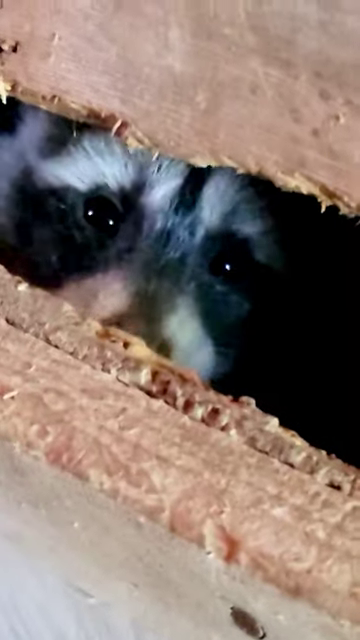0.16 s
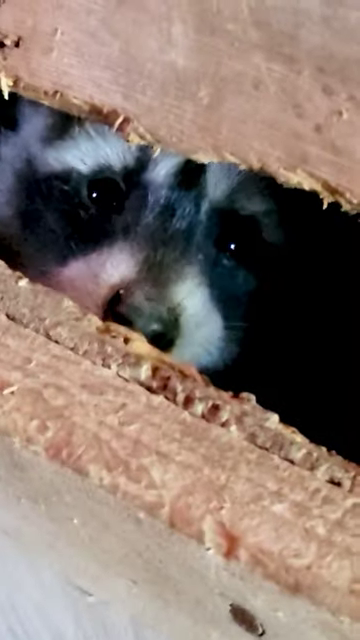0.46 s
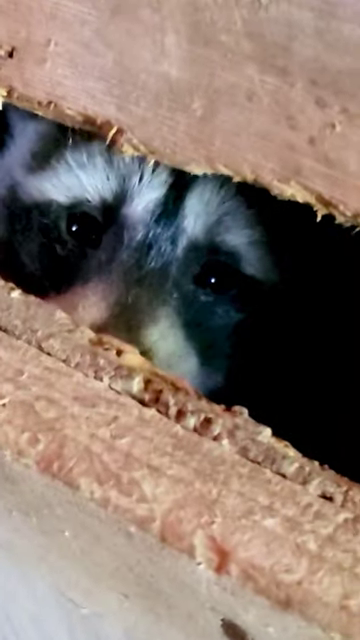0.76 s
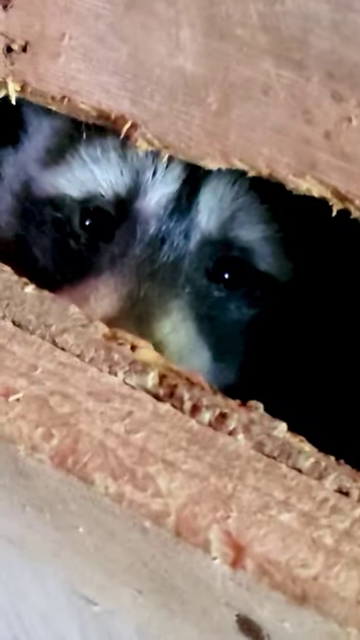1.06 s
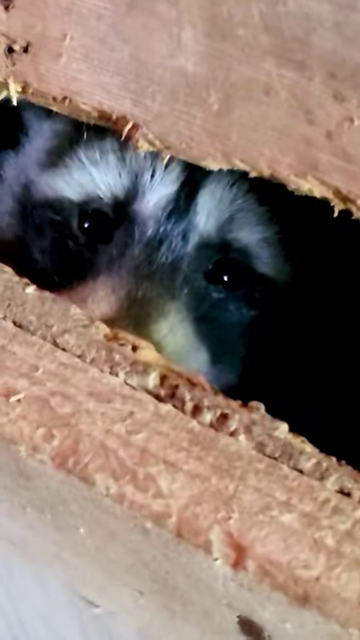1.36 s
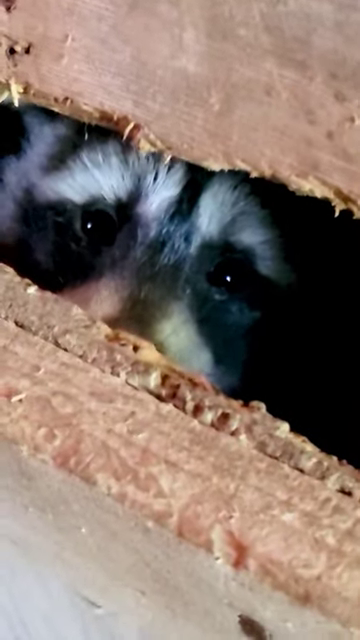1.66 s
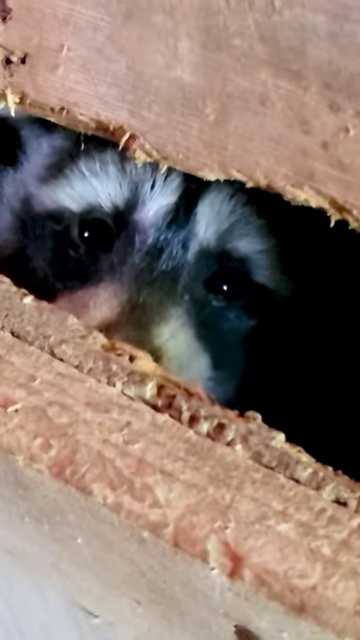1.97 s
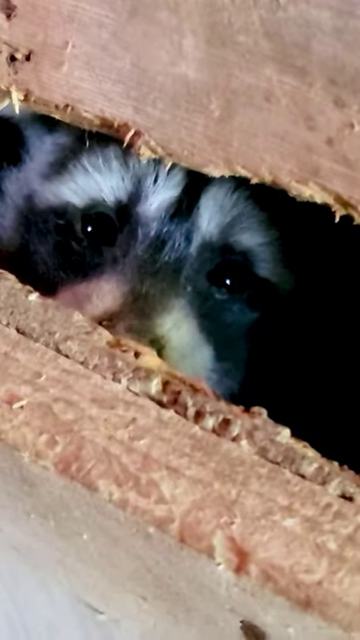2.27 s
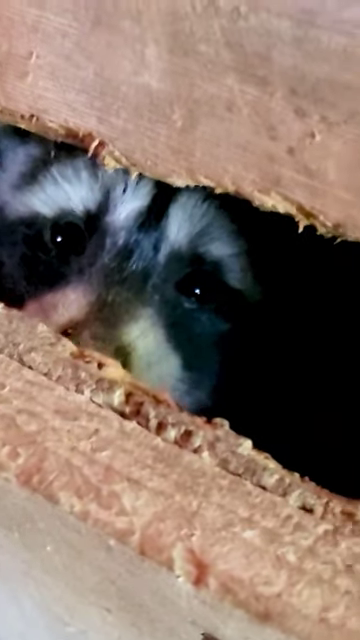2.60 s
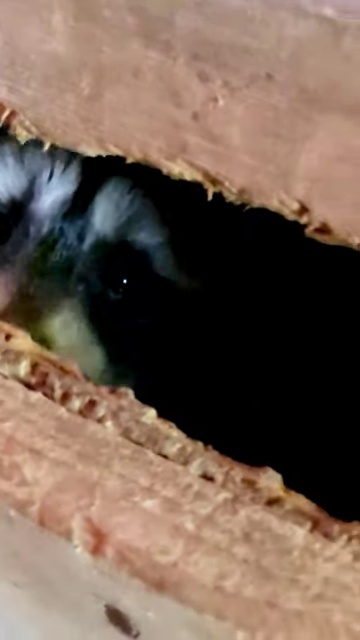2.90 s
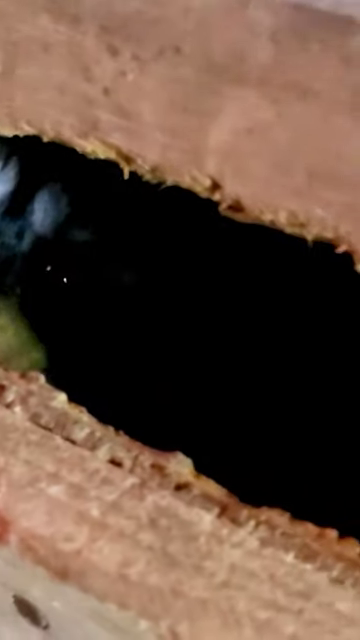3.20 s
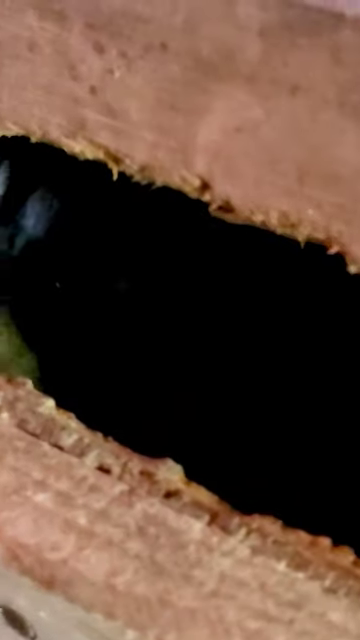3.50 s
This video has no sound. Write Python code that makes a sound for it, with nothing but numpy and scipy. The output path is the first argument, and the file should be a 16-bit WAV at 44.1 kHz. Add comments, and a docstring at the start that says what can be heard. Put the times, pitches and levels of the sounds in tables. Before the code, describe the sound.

Young raccoon chitters in three rapid, rasping bursts inside a hollow wooden machine, a bird whistling nearby

```python
"""Raccoon chittering in a wooden machine

Inside a hollow wooden machine a young raccoon chitters three times: runs of short near-sine chirps with
overtones, rasp and snaps through throat resonances, and puffs of nasal hiss. First comes the short end of an
earlier chirp (a dying sine). A bird whistles twice nearby (gliding sines with echoes), claws tick and knock
on the wood (dying sines, a noise crack), and faint far chirps and scuffs (narrow noise) sound.
Farm air (broad noise) and a low motor drone (narrow noise) lie under."""
import sys
import numpy as np
from scipy import signal
from scipy.fft import rfft, irfft
from scipy.io import wavfile

SR = 44100
rng = np.random.default_rng(int(sys.argv[2]) if len(sys.argv) > 2 else 0)


def gain_from_db(level_db):
    """Turn a decibel level (scalar or array-like) into a linear amplitude factor."""
    decades = np.asarray(level_db, float) / 20
    return 10 ** decades


def transcribe(signal):
    """Save signal, clipped to [-1, 1], as a 16-bit WAV file at the path in sys.argv[1]."""
    frames = np.atleast_2d(signal).T
    limited = np.clip(frames, -1, 1)
    pcm = np.round(limited * 32767).astype(np.int16)
    wavfile.write(sys.argv[1], SR, pcm)


N = 160965


def rms_one(x):
    """Scale to rms 1."""
    return x / np.sqrt(np.mean(x ** 2) + 1e-20)


def at_hz(points, hz):
    """Read a (Hz, value) table on a log-frequency axis."""
    table_hz, values = np.array(points).T
    return np.interp(np.log(hz), np.log(table_hz), values)


def drift(rate_hz):
    """Random wander with rms 1: white noise through two equal low-pass poles."""
    r = np.exp(-2 * np.pi * rate_hz / SR)
    noise = rng.standard_normal(N + SR)
    return rms_one(signal.lfilter([1], [1, -2 * r, r * r], noise)[SR:])


def peak(x, hz, width_hz):
    """A two-pole resonance with a gain of about 1 on top."""
    r = np.exp(-np.pi * width_hz / SR)
    poles = [1, -2 * r * np.cos(2 * np.pi * hz / SR), r * r]
    return signal.lfilter(np.array([1, 0, -1]) * (1 - r * r) / 2, poles, x)


def ring(start_s, db, hz, t60_s):
    """A dying sine: it rises within 0.67 ms and fades exponentially."""
    t = np.maximum(np.arange(N) / SR - start_s, 0)
    return gain_from_db(db - 60 * t / t60_s) * np.minimum(t / 0.00067, 1) * np.sin(2 * np.pi * hz * t)


def notes(tables, edge_s):
    """Pitch and gain in time for separate notes, gliding from row to row."""
    t = np.arange(N) / SR
    time_s, pitch_hz, level_db = np.concatenate(tables).T
    gate = 0
    for note in tables:
        inside_s = np.minimum(t - note[0][0], note[-1][0] - t)
        gate = gate + np.clip(inside_s / edge_s + .5, 0, 1)
    gain = np.minimum(gate, 1) * gain_from_db(np.interp(t, time_s, level_db))
    return np.interp(t, time_s, pitch_hz), gain


def coloured(spectrum, likeness):
    """Stereo noise of the given spectrum and left-right likeness; its mid part has rms 1."""
    hz = np.maximum(np.arange(N // 2 + 1) * SR / N, 1)
    mid, side = rfft(rng.standard_normal((2, N))) * gain_from_db(at_hz(spectrum, hz))
    alike = np.clip(at_hz(likeness, hz), -1, 1)
    mid = irfft(mid * np.sqrt(1 + alike), N)
    side = irfft(side * np.sqrt(1 - alike), N)
    return np.array([mid + side, mid - side]) / np.std(mid)


def placed(x):
    """Two microphones: a level difference by pitch and a short lag on the right."""
    # the left microphone gets more of the lows, the right more of the highs: pitch_hz, left_minus_right_db
    shadow = [(640, 6), (1400, 7), (3100, -2), (6800, -8)]
    lag_s = .00008
    hz = np.maximum(np.arange(N // 2 + 1) * SR / N, 1)
    tilt = gain_from_db(at_hz(shadow, hz) / 2)
    return irfft(rfft(x) * [tilt, np.exp(-2j * np.pi * hz * lag_s) / tilt], N)


def echoes(x, t60_s, cut_hz):
    """Dense dying reflections up to 0.4 s, others for each side, dulled above cut_hz."""
    t = np.arange(int(.4 * SR)) / SR
    tail = rng.standard_normal((2, len(t))) * gain_from_db(-60 * t / t60_s) * np.minimum(t / 0.0038, 1)
    tail = signal.sosfilt(signal.butter(1, cut_hz, fs=SR, output="sos"), tail)
    tail = tail / np.sqrt((tail ** 2).sum(1, keepdims=True))
    return signal.fftconvolve(x[None], tail, axes=1)[:, :N]


def raccoon():
    """The animal's voice and nose puffs at the microphones, with reflections from the hollow box."""
    both = chirping_voice() + nose_puffs()
    return placed(both) + gain_from_db(-11) * echoes(both[0], .15, 2600)


def chirping_voice():
    """Near-sine chirps; overtones, breath rasp and a closing snap pass the throat resonances."""
    # one table per chirp: time_s, pitch_hz, level_db (rms of the fundamental)
    chirps = [
        [(0.052, 1050, -40), (0.06, 1104, -27.5), (0.066, 850, -40), (0.077, 950, -27), (0.083, 1000, -51)],
        [(0.107, 866, -29), (0.112, 1126, -30), (0.12, 755, -17), (0.128, 699.4, -18), (0.135, 855, -37)],
        [(0.161, 850, -37), (0.169, 960, -28), (0.179, 1050, -34.5), (0.182, 790, -15), (0.186, 780, -14),
         (0.19, 850, -31.5)],
        [(0.221, 980, -33.5), (0.228, 740, -18), (0.233, 680, -24.5), (0.239, 660, -16), (0.248, 720, -30)],
        [(0.271, 931, -26), (0.28, 727, -19.5), (0.287, 671, -16.5), (0.291, 1095, -24), (0.296, 1009, -37)],
        [(0.324, 950, -36), (0.336, 1000, -39), (0.341, 860, -20), (0.348, 893, -36)],
        [(1.675, 789.6, -38), (1.682, 884.5, -60)],
        [(1.724, 1013, -48), (1.726, 971, -28), (1.729, 1103, -40), (1.742, 797, -23), (1.748, 1042, -53)],
        [(1.784, 1106, -53), (1.786, 1037, -27.5), (1.796, 1135, -33), (1.803, 849.5, -18), (1.81, 913, -42)],
        [(1.844, 817, -25), (1.856, 1088, -32), (1.864, 771.2, -13), (1.872, 889, -36)],
        [(1.904, 868, -50), (1.907, 842.7, -31), (1.922, 1141, -39), (1.931, 878.7, -17.5), (1.937, 964, -54)],
        [(1.964, 887, -37.5), (1.976, 1126, -23.5), (1.986, 792, -34), (1.992, 890.5, -15.5), (1.998, 936, -42)],
        [(2.027, 950, -30), (2.032, 1100, -22), (2.036, 760, -28), (2.046, 720.4, -23), (2.05, 908, -28),
         (2.055, 1019, -22.5)],
        [(2.084, 839.7, -15), (2.105, 664.4, -28), (2.11, 811.8, -21.5), (2.115, 909, -23)],
        [(2.148, 978, -31), (2.156, 1070, -25.5), (2.164, 740, -31), (2.171, 720, -32), (2.175, 963.6, -22.5),
         (2.18, 906, -46.5)],
        [(2.211, 930, -34.5), (2.23, 1060, -32.5), (2.235, 780, -24.5), (2.246, 730, -32.5),
         (2.253, 930, -19.5)],
        [(2.289, 800, -45.5), (2.305, 850, -36.5), (2.316, 800, -46), (2.335, 900, -41), (2.362, 780, -42.5)],
        [(3.044, 917, -45), (3.054, 760, -45.5)],
        [(3.088, 996, -29.5), (3.099, 876, -44), (3.103, 731, -31)],
        [(3.145, 1006, -26.5), (3.159, 831, -35.5), (3.167, 1054, -36), (3.172, 1094, -27.5)],
        [(3.201, 1078, -24.5), (3.205, 828.6, -18), (3.218, 760, -21.5), (3.224, 893, -17)],
        [(3.257, 918, -31), (3.26, 896.7, -15.5), (3.271, 705.5, -17.5), (3.282, 878, -17), (3.285, 811.5, -35)],
        [(3.315, 953, -19.5), (3.321, 902, -21), (3.324, 720, -17), (3.34, 728, -15), (3.345, 727, -30.5)],
        [(3.377, 930, -20.5), (3.386, 708, -19), (3.398, 738, -17), (3.406, 855, -17.5)],
        [(3.437, 814.7, -23), (3.441, 727.6, -14.5), (3.447, 665, -21.5), (3.459, 725, -21.5),
         (3.464, 723, -38.5)],
        [(3.491, 739.3, -23), (3.502, 681, -22), (3.509, 713, -19.5), (3.515, 704, -35)],
        [(3.544, 1023, -28), (3.552, 652, -18), (3.557, 676, -21.5), (3.563, 795, -43)],
    ]
    # 2nd to 7th partial before the throat colours them: level_db
    overtones = [-16.5, -15, -29.5, -28.5, -20.5, -22.5]
    # throat resonances: pitch_hz, width_hz, gain_db
    throat = [(1269, 125, 6.5), (1872, 226, 7), (2140, 100, -1.5), (2756, 145, -1.5), (3300, 540, -21.5)]
    # lower and upper limit of the throat sound: cutoff_hz
    throat_band = [470, 4750]
    jitter, shimmer_db = .013, 1.4  # pitch wander (share of the pitch) and level wander of a firm voice
    weak_db, rough_per_db = -30, .2  # below this level both wanders grow, by this share per dB
    rasp_db, closing_db, closing_s = -16.5, -13.5, 0.0023  # before the throat; delay and width of the snap

    hz, gain = notes(chirps, 0.0017)
    weak = 1 + rough_per_db * np.clip(weak_db - 20 * np.log10(gain + 1e-9), 0, 10)
    phase = 2 * np.pi * np.cumsum(hz * (1 + jitter * weak * drift(198.5))) / SR
    tone = np.sqrt(2) * gain * np.sin(phase) * gain_from_db(shimmer_db * weak * drift(157))
    upper = 0
    for k, db in enumerate(overtones):
        upper = upper + gain * gain_from_db(db + 5.24 * drift(28)) * np.sin((k + 2) * phase + k)

    # the throat snaps shut just after the louder of a chirp's last two rows
    t, snap = np.arange(N) / SR, 0
    for chirp in chirps:
        last_s, _, db = max(chirp[-2:], key=lambda row: row[2])
        snap = snap + gain_from_db(db + closing_db) * np.exp(-((t - last_s - closing_s) / closing_s) ** 2)

    breath = rng.standard_normal(N) * (1 + np.cos(phase)) * 2  # pulses once a cycle
    source = upper + breath * (gain_from_db(rasp_db) * gain + snap)
    resonant = sum(gain_from_db(db) * peak(source, f, width) for f, width, db in throat)
    band = signal.butter(3, throat_band, "band", fs=SR, output="sos")
    return tone + signal.sosfilt(band, resonant)


def nose_puffs():
    """Puffs of air hiss at the nose: grainy coloured noise with a quick rise and a dying tail."""
    # puffs: time_s (middle of the rise), peak_db (the noise envelope lies 13 dB lower)
    puffs = [(0.0605, -38.5), (0.1174, -41.5), (0.178, -39), (0.2275, -37.5), (0.2783, -37.5),
             (0.3384, -43), (0.373, -47), (1.734, -38.5), (1.798, -41.5), (1.8584, -38), (1.9245, -40),
             (1.98, -36.5), (2.0348, -33.5), (2.087, -35.5), (2.1576, -35.5), (2.235, -36.5), (2.3565, -47),
             (3.045, -50), (3.096, -44), (3.1528, -36.5), (3.2031, -39), (3.27, -33.5), (3.3234, -38),
             (3.3807, -37), (3.4396, -37), (3.4994, -37), (3.5468, -41), (3.6277, -42)]
    # shape of the hiss: pitch_hz, level_db (per Hz, relative)
    hiss = [(3000, -29.5), (4500, -4), (5400, -9), (6500, 0.5), (8000, -3), (10500, -14.5), (12000, -16),
            (15400, -28)]
    rise_s, hold_s, t60_s, grain_db = 0.0092, 0.0073, 0.11, 3.5
    t, flow = np.arange(N) / SR, 0
    for s, db in puffs:
        rise = np.clip((t - s) / rise_s + .5, 0, 1) ** 2
        fall_db = 60 * np.maximum(t - s - hold_s, 0) / t60_s
        flow = flow + rise * gain_from_db(db - 13 - fall_db)
    return flow * gain_from_db(grain_db * drift(150)) * coloured(hiss, [(SR, .6)])


def bird():
    """Two mostly falling whistles: unsteady gliding sines that overlap their own echoes."""
    # one table per whistle: time_s, pitch_hz, level_db
    whistles = [
        [(1.685, 2830, -49.5), (1.72, 2744, -30), (1.8, 2648, -37), (1.86, 2612, -53), (2.0, 2612, -49)],
        [(3.452, 3000, -41), (3.485, 2826, -24.5), (3.545, 2757, -24), (3.565, 2849, -34), (3.65, 2816, -37.5)],
    ]
    hz, gain = notes(whistles, 0.0047)
    phase = 2 * np.pi * np.cumsum(hz * (1 + 0.002 * drift(67.2))) / SR
    tone = np.sqrt(2) * gain * gain_from_db(2.5 * drift(40)) * np.sin(phase)
    return placed(tone) + gain_from_db(-9) * echoes(tone, 0.66, 5300)


def short_rings_and_knocks():
    """A chirp's end and claw ticks ring one short pitch; knocks crack, ring the plank and linger in the hollow."""
    # claw ticks on wood, and first the short end of an earlier chirp: start_s, level_db, pitch_hz
    short_rows = [(.006, -36, 980), (1.153, -47, 1720), (1.624, -45, 2710), (2.8405, -28, 2650),
                  (2.857, -28, 2550)]
    # knocks: start_s, level_db
    knock_rows = [(2.936, -32), (2.957, -29)]
    # ringing modes of the plank: pitch_hz, level_db (relative to the knock), t60_s
    plank = [(519, -5, .04), (937, -10, .03), (1690, -7, .09), (2250, -4, .025), (2620, -3, .025)]
    crack_db, crack_t60_s = -8, .09  # level relative to the knock, before the resonances

    short_rings = sum(ring(s, db, hz, .017) for s, db, hz in short_rows)
    t, knocks, crack = np.arange(N) / SR, 0, 0
    for s, db in knock_rows:
        for hz, mode_db, t60_s in plank:
            knocks = knocks + ring(s, db + mode_db + rng.normal(0, 0.71), hz, t60_s)
        crack = crack + (t > s) * gain_from_db(db + crack_db - 60 * np.abs(t - s) / crack_t60_s)
    crack = crack * rng.standard_normal(N)
    knocks = knocks + 2 * peak(peak(crack, 2000, 2000), 2000, 2000)
    return short_rings + knocks + gain_from_db(-6) * echoes(knocks + short_rings / 2, .3, 2000)


def far_chirps():
    """Faint blurred tones from a distance, and scuffs that sound four tones at once: narrow noise."""
    # far chirps: start_s, length_s, pitch_hz, level_db
    far = [(1.095, .035, 3330, -54), (1.12, .04, 2850, -63)]
    # two short scuffs: start_s
    scuffs = [.996, 1.538]
    # tones within each scuff: pitch_hz, level_db
    scuff_tones = [(2260, -63), (4000, -63), (5350, -66), (6500, -70)]
    scuff_s, width_hz = .03, 110
    events = far + [(s, scuff_s, hz, db) for s in scuffs for hz, db in scuff_tones]
    out = 0
    for s, length_s, hz, db in events:
        _, gain = notes([[(s, hz, db), (s + length_s, hz, db)]], 0.0038)
        out = out + gain * rms_one(peak(rng.standard_normal(N), hz, width_hz))
    return out + gain_from_db(-8) * echoes(out, .1, 8000)


def farm_air():
    """Broad outdoor noise and a wavering motor drone of narrow noise, swelling together."""
    # shape of the outdoor noise: pitch_hz, level_db (per Hz, relative)
    air_spectrum = [(60, -40), (76, -8), (105, -8), (160, -18), (270, -27), (900, -23.5), (1300, -30.5),
                    (2500, -35.5), (5000, -48.5), (7500, -44.5), (9600, -58.5), (15400, -55)]
    # course of the background; only the rise above its lowest row counts: time_s, level_db
    air_swell = [(0, -46.5), (0.346, -42.5), (.5, -48.5), (1.599, -49), (1.8, -44), (2.3, -43.5),
                 (2.498, -51), (3.65, -41)]
    # left-right likeness of the outdoor noise: pitch_hz, likeness (-1 to 1)
    air_likeness = [(60, 1), (240, 0.5), (950, -0.51), (3760, -0.14), (15000, -0.035)]
    air_db, drone_db = -52, -53  # before the swell is added
    drone_hz, drone_width_hz = 79, 1.7
    pan_db = 0.5  # left minus right

    s, db = np.transpose(air_swell)
    swell_db = np.interp(np.arange(N) / SR, s, db - db.min())
    drone = rms_one(peak(rng.standard_normal(N + SR), drone_hz, drone_width_hz)[SR:])
    air = gain_from_db(air_db) * coloured(air_spectrum, air_likeness) + gain_from_db(drone_db) * drone
    return air * gain_from_db(swell_db + 1.2 * drift(13.0)) * gain_from_db([[pan_db / 2], [-pan_db / 2]])


def scene():
    """All sources at the two microphones."""
    return raccoon() + bird() + short_rings_and_knocks() + far_chirps() + farm_air()


def low_pass(x):
    """Removes everything above the highest recorded frequency."""
    return signal.sosfilt(signal.butter(12, 15550, fs=SR, output="sos"), x)


def record(dry):
    """The finished mix as the phone stores it."""
    return low_pass(dry)


dry = scene()
out = record(dry)
transcribe(out)
```